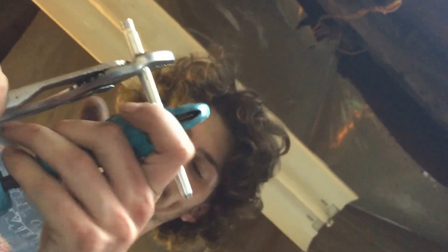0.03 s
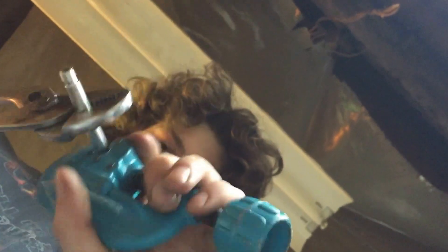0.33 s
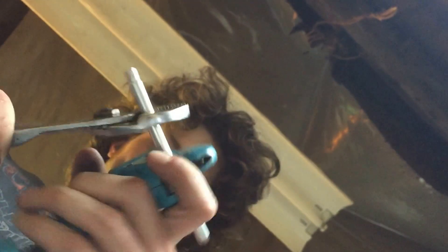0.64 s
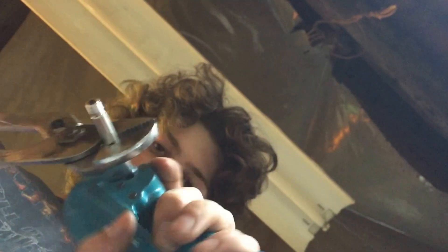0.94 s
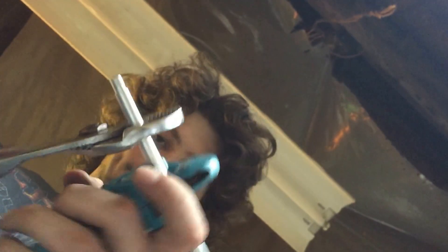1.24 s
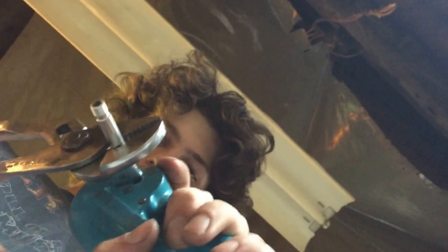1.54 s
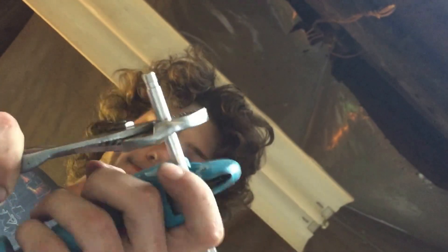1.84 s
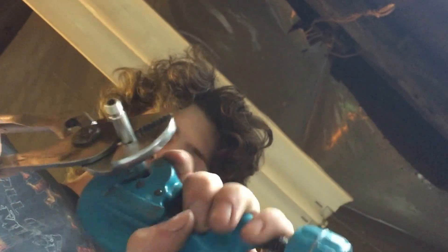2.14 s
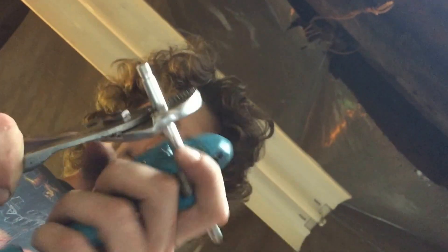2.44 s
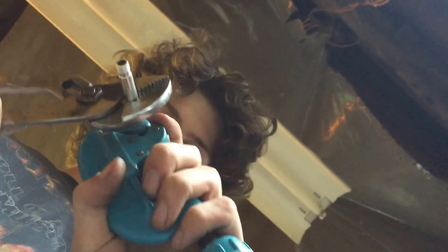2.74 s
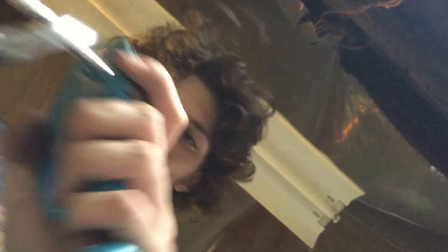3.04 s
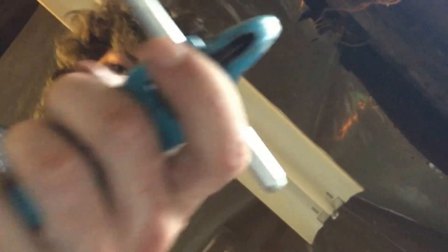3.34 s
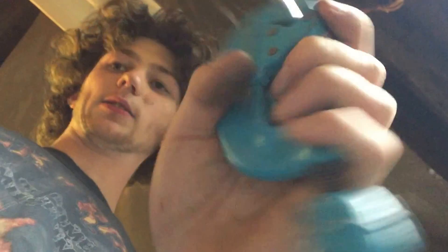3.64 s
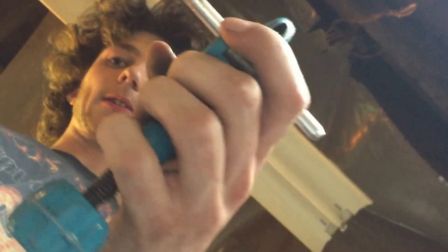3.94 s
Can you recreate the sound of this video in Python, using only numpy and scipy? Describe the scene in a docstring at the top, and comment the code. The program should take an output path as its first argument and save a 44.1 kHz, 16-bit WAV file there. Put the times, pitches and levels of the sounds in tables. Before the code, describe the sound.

A hand tool scrapes and ticks faintly, close by, on a metal rod held in pliers. The pliers then rattle and rasp off the rod, and two sharp snaps follow, over a low fan-like hum in a garage.

```python
"""Hand tool on a metal rod.

Close by, in a garage where a fan-like machine hums, a tool is turned back and forth on a rod held
in pliers. Each turn scrapes in tiny slips and ticks as the jaws catch. The pliers then rattle and
rasp off the end of the rod, ringing the steel, and the tool snaps twice. Between the snaps a dull
clack sounds and the hum cuts off."""
import sys
import numpy as np
from scipy import signal
from scipy.io import wavfile
from scipy.ndimage import uniform_filter1d, map_coordinates

SR = 44100
rng = np.random.default_rng(int(sys.argv[2]) if len(sys.argv) > 2 else 0)


def bounce(signal):
    """Save signal as a 16-bit WAV file at the path given by the first command-line argument."""
    frames = np.transpose(np.atleast_2d(signal))
    limited = np.clip(frames, -1, 1)
    pcm = np.round(limited * 32767).astype(np.int16)
    wavfile.write(sys.argv[1], SR, pcm)


N = 176400

# Spectrum of the jaws on the rod. Each row: frequency in Hz, level in dB.
JAW_SPECTRUM = [(400, -21.5), (1800, 5), (2700, -.5), (4500, 2.5), (5500, -.5), (7100, .5), (9500, -7.5),
                (10400, -14), (11800, -8), (15500, -19)]
# Modes of rod and pliers. Each row: frequency in Hz, level in dB, T60 in seconds.
STEEL_MODES = [(1915, 0, .06), (3350, -2, .04), (4585, -1, .06), (4910, 2, .06), (5114, 0, .04),
               (5810, -1, .05), (7140, 1, .04)]
# Spectrum of a dull knock. Each row: frequency in Hz, level in dB.
KNOCK_SPECTRUM = [(200, -6), (700, -9), (1250, 1), (1800, -11), (2200, -2), (2700, -19), (9000, -46)]


def amp(db):
    """Decibels to gain."""
    return 10 ** (np.asarray(db) / 20)


def unit_rms(x):
    """Scales to rms 1."""
    return x / np.sqrt(np.mean(x ** 2) + 1e-20)


def unit_hit(x):
    """Scales a short sound to the energy of 3 ms at rms 1."""
    return x * np.sqrt(.003 * SR / (np.sum(x ** 2) + 1e-20))


def curve(rows, column=1):
    """One column of a time table, at every sample."""
    rows = np.array(rows)
    return np.interp(np.arange(N) / SR, rows[:, 0], rows[:, column])


def spectrum_db(spectrum, hz):
    """Level at hz, interpolated in log frequency."""
    knots_hz, db = np.transpose(spectrum)
    return np.interp(np.log(hz + 1), np.log(knots_hz), db)


def add(mix, start_s, sound):
    """Mixes a sound in at start_s."""
    part = mix[max(round(start_s * SR), 0):][:len(sound)]
    part += sound[:len(part)]


def wander(step_samples):
    """Smooth random motion of rms 1."""
    knots = rng.standard_normal(N // step_samples + 2)
    return unit_rms(map_coordinates(knots, [np.arange(N) / step_samples], order=3, mode="nearest"))


def colour(x, spectrum, size=2048):
    """Minimum-phase filter with the given spectrum."""
    log_gain = np.log(amp(spectrum_db(spectrum, abs(np.fft.fftfreq(size, 1 / SR)))))
    taps = np.fft.ifft(np.exp(np.conj(signal.hilbert(log_gain)))).real
    return signal.fftconvolve(x, taps[:size // 2])[:len(x)]


def resonate(x, hz, width_hz):
    """A resonance that follows the curve hz."""
    carrier = np.exp(2j * np.pi * np.cumsum(hz) / SR)
    pole = np.exp(-np.pi * width_hz / SR)
    return (carrier * signal.lfilter([1 - pole], [1, -pole], x / carrier + 1e-18)).real


def burst(decay_s, size=4096):
    """Decaying noise of one contact."""
    return rng.standard_normal(size) * np.exp(-np.arange(size) / SR / decay_s)


def ring(modes, vary_db=0, size=8192):
    """Decaying sines with random phases."""
    t = np.arange(size) / SR
    hz, db, t60_s = np.transpose(modes)[:, :, None]
    envelopes = amp(db + vary_db * rng.standard_normal(hz.shape) - 60 * t / t60_s)
    return (envelopes * np.sin(2 * np.pi * (hz * t + rng.random(hz.shape)))).sum(0)


def wash(spectrum, patchy_db):
    """Noise of rms 1 with drifting patches in its spectrum."""
    hz = np.fft.rfftfreq(2048, 1 / SR)
    real, imag, patches = rng.standard_normal((3, N // 512 + 5, len(hz)))
    patches = unit_rms(uniform_filter1d(uniform_filter1d(patches, size=8, axis=0), size=4, axis=1))
    frames = (real + 1j * imag) * amp(spectrum_db(spectrum, hz) + patchy_db * patches)
    return unit_rms(signal.istft(frames.T, nperseg=2048, noverlap=1536)[1][:N])


def friction(strokes, spectrum, slips_per_s, spread_db, squeak_db):
    """Tiny random slips, their colour shifting with the grip; each stroke judders and squeaks."""
    grip_db, judder_db, squeak_drift, edge_s = 5.5, 1.7, .012, .012
    slips = (rng.random(N) < slips_per_s / SR) * rng.choice([-1, 1], N)
    slips = slips * amp(spread_db * np.minimum(rng.exponential(1, N), 4))
    frames = signal.stft(colour(slips, spectrum), nperseg=512)[2]
    patches = uniform_filter1d(rng.standard_normal(frames.shape), size=6, axis=1)
    patches = unit_rms(uniform_filter1d(patches, size=2, axis=0))
    body = signal.istft(frames * amp(grip_db * patches))[1][:N]
    detune = 1 + squeak_drift * wander(1500)
    judder = amp(judder_db * wander(300))
    t, out = np.arange(N) / SR, np.zeros(N)
    for start_s, length_s, from_db, to_db, squeak_hz in strokes:
        end_s = start_s + length_s
        gate = np.clip(np.minimum(t - start_s, end_s - t) / edge_s + .5, 0, 1)
        on = gate > 0
        pressure = gate[on] * np.interp(t[on], [start_s, end_s], amp([from_db, to_db]))
        squeak = unit_rms(resonate(slips[on], squeak_hz * detune[on], width_hz=280))
        out[on] += pressure * unit_rms(judder[on] * (unit_rms(body[on]) + amp(squeak_db) * squeak))
    return out


def machine():
    """Beating hum lines that waver together, over rushing air."""
    # Each row: frequency in Hz, level in dB.
    hum_lines = [(84.1, -41.5), (66.3, -52), (168.4, -57.5), (252.8, -66), (360, -71.5)]
    # Each row: frequency in Hz, level in dB.
    air_spectrum = [(22, -45), (45, -3), (125, 1), (220, -4.5), (330, -15), (640, -19.5), (950, -5.5),
                    (1600, -8.7), (2600, -28.5), (5000, -33.5), (15500, -42.5)]
    # Each row: time in seconds, hum gain in dB, air gain in dB.
    gains = [(0, -0.5, -2.5), (.55, -3.5, -0.5), (1.4, -2.5, 2), (1.7, 1, 0.5), (2.85, 1.5, -.5),
             (3.55, 0, 2)]
    waver_hz, throb_db, air_db = .55, 1.6, -48.5
    drift_hz = waver_hz * wander(5000)
    warped_s = np.arange(N) / SR + np.cumsum(drift_hz) / SR / hum_lines[0][0]
    hum = sum(amp(db) * np.sqrt(2) * np.sin(2 * np.pi * (hz * warped_s + rng.random()))
              for hz, db in hum_lines)
    hum *= amp(curve(gains) + throb_db * wander(2500))
    air = wash(air_spectrum, patchy_db=2.4) * amp(air_db + curve(gains, column=2))
    return hum + air


def jaw_ticks():
    """Each catch cracks, pitched by its contact point, and rings the steel, detuned by the grip."""
    # Each row: start in seconds, level in dB, contact pitch in Hz.
    catches = [(.208, -58, 6090), (.5795, -50, 4450), (.6245, -43, 3100), (.6315, -34, 6900),
               (.657, -46, 5100), (.703, -43.5, 6590), (.9745, -43.5, 5170), (1.138, -53, 3250),
               (1.543, -44.5, 4700), (1.747, -44, 8230), (2.3022, -47, 4400), (2.5192, -49, 7930),
               (2.5686, -53, 7420), (2.9377, -40.5, 4970), (3.0665, -32, 7310), (3.0725, -33, 4230),
               (3.075, -33, 4590), (3.0932, -36, 7340), (3.0958, -34, 4900), (3.1205, -30, 6980),
               (3.128, -35, 7070), (3.156, -38, 4220), (3.1672, -30, 7080), (3.1725, -34, 4650),
               (3.1825, -35, 8020), (3.1905, -36, 7800), (3.1962, -29, 4580), (3.2495, -32, 6990)]
    # Notes left as the jaws jump clear.
    # Each row: start in seconds, frequency in Hz, level in dB, T60 in seconds.
    pings = [(.6315, 1935, -39, .055), (.6315, 5114, -37.5, .04), (.703, 3450, -45, .035),
             (1.568, 3375, -54, .05), (3.2495, 2130, -36, .14)]
    clink_db, ring_db, vary_db, grip_detune = -4, -10, 2, .012
    out = np.zeros(N)
    for start_s, level_db, contact_hz in catches:
        spectrum = [(hz, db + vary_db * rng.standard_normal()) for hz, db in JAW_SPECTRUM]
        crack = unit_hit(colour(burst(decay_s=.0021), spectrum))
        clink = unit_hit(resonate(crack, np.full(len(crack), contact_hz), width_hz=500))
        modes = [(hz * (1 + grip_detune * rng.standard_normal()), db, t60_s)
                 for hz, db, t60_s in STEEL_MODES]
        add(out, start_s, amp(level_db) * unit_hit(crack + amp(clink_db) * clink))
        add(out, start_s, amp(level_db + ring_db) * unit_hit(ring(modes, vary_db)))
    for start_s, *mode in pings:
        add(out, start_s, ring([mode]))
    return out


def tool_scrape():
    """The turning tool slips on the rod in a fine, squeaky scrape; a last stroke of the same scrape brightens
    the rasp of the jaws."""
    # Each row: start and length in seconds, first and last level in dB, squeak in Hz. The last row adds bright
    # scrape to the rasp of the jaws.
    turns = [(.645, .063, -56, -53, 6750), (.965, .025, -57, -57, 5150), (1.136, .1, -62, -60, 7250),
             (1.24, .1, -54, -54, 8400), (1.378, .035, -54, -59, 5800), (1.745, .065, -52, -55, 11900),
             (1.81, .045, -49, -48.5, 8400), (1.875, .042, -55.5, -56.5, 7200),
             (2.298, .105, -55, -57, 11950), (2.405, .075, -50, -56, 8300), (2.515, .075, -59, -63, 7250),
             (3.19, .055, -45, -45, 8300)]
    # Each row: frequency in Hz, level in dB.
    spectrum = [(1200, -22), (3200, -3), (4700, -3), (5700, -6), (7100, 0), (8450, 2), (10500, -7),
                (12000, 3), (13000, -4), (15500, -6)]
    return friction(turns, spectrum, slips_per_s=5000, spread_db=3.9, squeak_db=-6.5)


def hand_rubs():
    """Each shift of the grip is a short swell of low rubbing."""
    # Each row: centre in seconds, level in dB.
    rubs = [(1.52, -49), (1.93, -50), (3.03, -51), (4.02, -51)]
    # Each row: frequency in Hz, level in dB.
    spectrum = [(20, -36), (115, -4), (220, 1), (450, -15), (3000, -40)]
    t, width_s = np.arange(N) / SR, .07
    swells = sum(amp(db) * np.exp(-((t - centre_s) / width_s) ** 2) for centre_s, db in rubs)
    return wash(spectrum, patchy_db=2) * swells


def jaw_rasp():
    """Teeth drag along the rod and set the steel ringing."""
    # Each row: start and length in seconds, first and last level in dB, squeak in Hz.
    drags = [(3.06, .105, -50, -49, 7140), (3.167, .043, -44, -35.5, 3300),
             (3.21, .034, -31.5, -35.5, 4850)]
    rasp = friction(drags, JAW_SPECTRUM, slips_per_s=2600, spread_db=1.5, squeak_db=-8)
    ringing = unit_rms(signal.fftconvolve(rasp, ring(STEEL_MODES))[:N]) * rasp.std()
    return rasp + amp(-12) * ringing


def tool_snaps():
    """The tool snaps and bounces: bright hand-damped clicks over a knock of its body."""
    # Each row: start in seconds, click level in dB, knock relative to the click in dB.
    hits = [(3.3979, -21, -18), (3.405, -27, -16), (3.4075, -32.5, -14), (3.4135, -35, -7),
            (3.6564, -29, -5.5), (3.6652, -33.5, -7)]
    # Each row: frequency in Hz, level in dB.
    click_spectrum = [(800, -26), (2500, -15), (4000, -17.5), (5800, -0.5), (6400, -1.5), (7150, 4),
                      (8000, -5), (9200, -9.5), (10300, -19), (11600, -12), (13400, -13), (14600, -28)]
    out = np.zeros(N)
    for start_s, db, knock_db in hits:
        contact = burst(decay_s=.0011) + amp(-15.5) * burst(decay_s=.005)
        click = unit_hit(colour(contact, click_spectrum))
        knock = unit_hit(colour(burst(decay_s=.003), KNOCK_SPECTRUM))
        add(out, start_s, amp(db) * (click + amp(knock_db) * knock))
    return out


def dull_clack(start_s, rise_s=.002):
    """A dull clack just before the hum cuts off: damped modes over a knock."""
    # Each row: frequency in Hz, level in dB, T60 in seconds.
    modes = [(1200, -25, .017), (2160, -31, .025), (2960, -31.5, .03), (4060, -24.5, .026),
             (6855, -32.5, .025)]
    ringing = ring(modes)
    knock = unit_hit(colour(burst(decay_s=.006, size=len(ringing)), KNOCK_SPECTRUM))
    attack = np.minimum(np.arange(len(ringing)) / SR / rise_s, 1)
    out = np.zeros(N)
    add(out, start_s, attack * (ringing + amp(-24) * knock))
    return out


def room_noise():
    """Faint room noise after the hum cuts off."""
    # Each row: frequency in Hz, level in dB.
    spectrum = [(20, -10), (78, 11), (250, -11), (1150, -6.5), (2100, -11), (2600, -25), (7000, -24.5),
                (12000, -36.5)]
    # Each row: time in seconds, level in dB.
    levels = [(3.585, -52.5), (3.74, -58), (3.83, -52.5), (3.96, -52.5), (4.0, -44.5)]
    return wash(spectrum, patchy_db=3) * amp(curve(levels))


def garage_reverb(x, level_db=-22, t60_s=.17, rise_s=.005):
    """Room reflections as a short, faint noise tail."""
    t = np.arange(SR // 2) / SR
    tail = rng.standard_normal(len(t)) * amp(-60 * t / t60_s) * np.minimum(t / rise_s, 1)
    return amp(level_db) * signal.fftconvolve(x, tail / np.linalg.norm(tail))[:N]


def scene():
    """Tools up front; behind them, hum, air and clack give way to room noise at hum_end_s."""
    hum_end_s, fade_s = 3.585, .001
    tools = jaw_rasp() + tool_scrape() + jaw_ticks() + tool_snaps()
    front = tools + garage_reverb(tools) + hand_rubs()
    gate = np.clip((hum_end_s - np.arange(N) / SR) / fade_s, 0, 1)
    behind = gate * (machine() + dull_clack(start_s=3.5757)) + (1 - gate) * room_noise()
    return (front + behind)[None]


def record(dry):
    """Steep low-pass at 15.4 kHz."""
    taps = signal.firwin(301, 15400, window=("kaiser", 9), fs=SR)
    return signal.oaconvolve(dry, taps[None], "same")


dry = scene()
out = record(dry)
bounce(out)
```